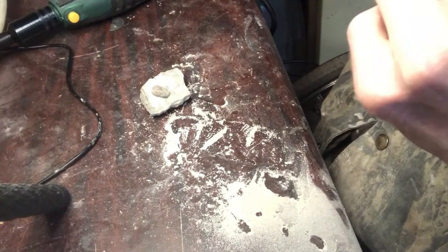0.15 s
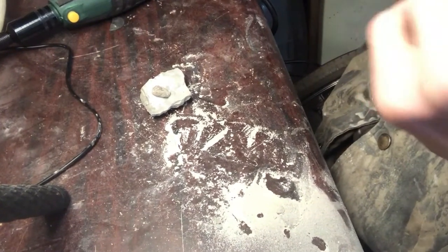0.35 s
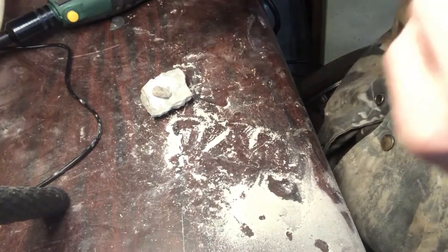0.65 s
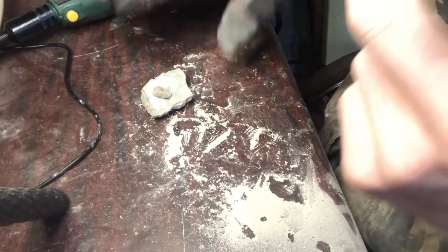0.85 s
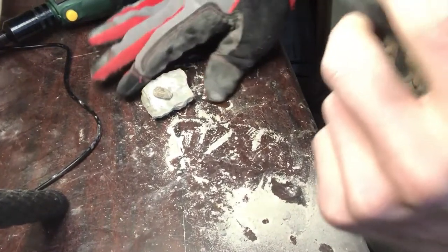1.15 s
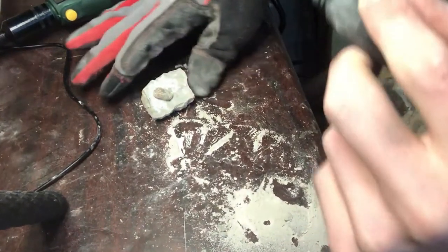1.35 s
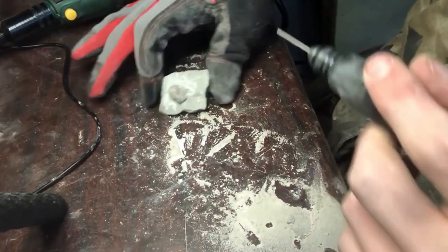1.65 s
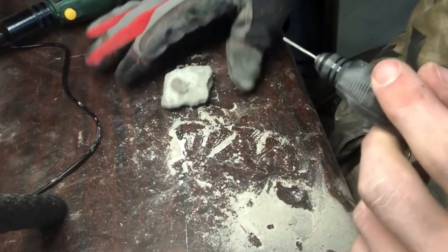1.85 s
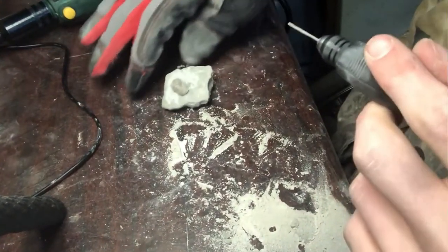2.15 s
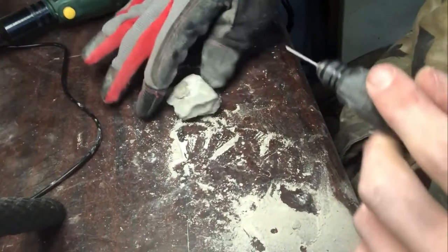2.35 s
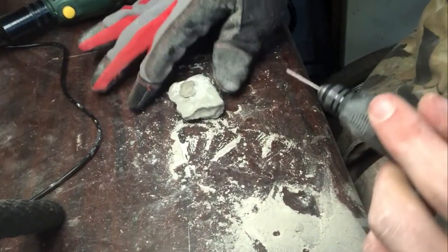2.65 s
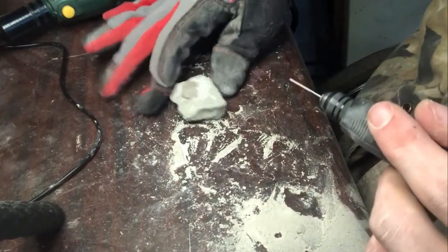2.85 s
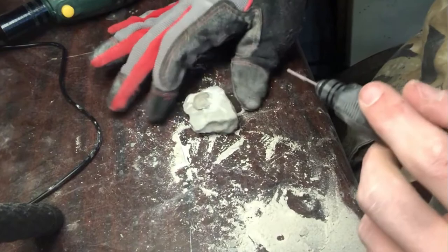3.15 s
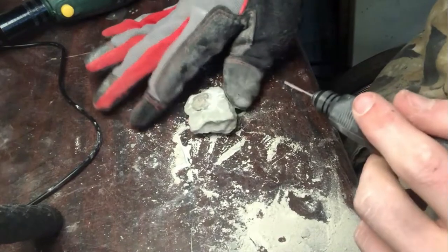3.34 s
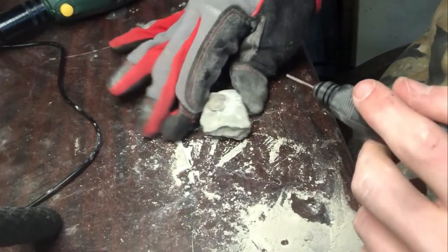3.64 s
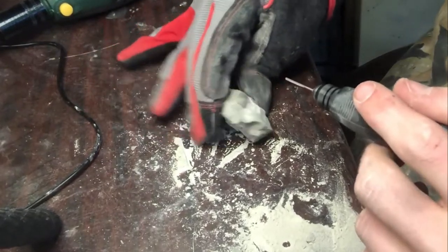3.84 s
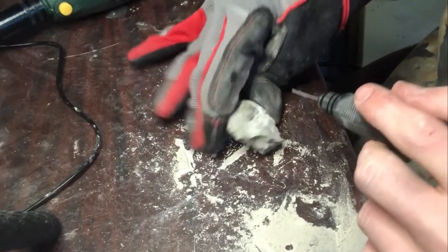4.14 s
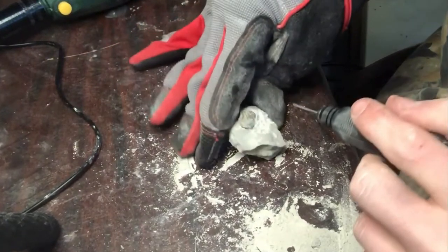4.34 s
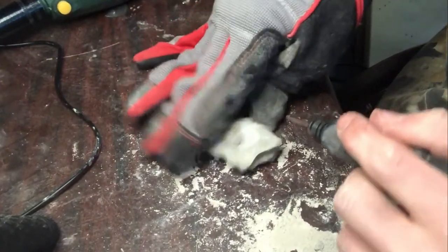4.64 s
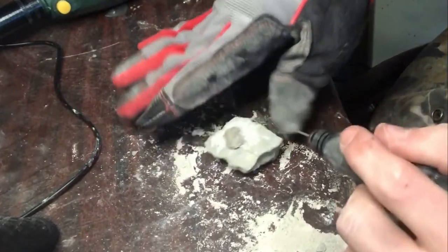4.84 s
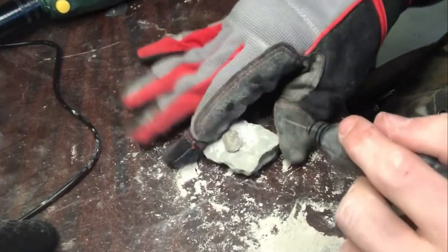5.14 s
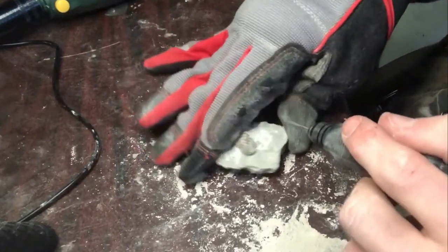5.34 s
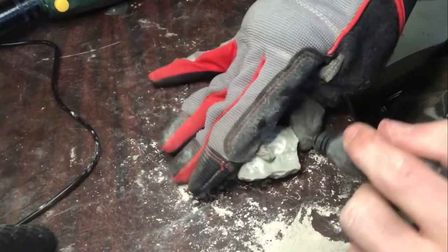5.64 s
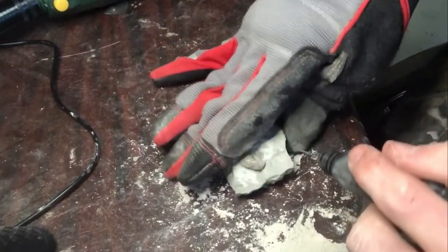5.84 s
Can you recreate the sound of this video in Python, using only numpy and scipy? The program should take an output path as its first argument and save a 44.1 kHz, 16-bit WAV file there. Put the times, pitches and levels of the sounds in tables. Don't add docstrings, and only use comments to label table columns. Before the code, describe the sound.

A handheld rotary tool whirs steadily close by in a small room, a stone clicks and scuffs on wood, then everything fades out.

```python
import sys
import numpy as np
from scipy import signal
from scipy.io import wavfile
from scipy.ndimage import uniform_filter1d

SR = 44100
rng = np.random.default_rng(int(sys.argv[2]) if len(sys.argv) > 2 else 0)


def dump_mix(stems):
    frames = np.atleast_2d(stems).T
    limited = np.clip(frames, -1, 1)
    pcm = np.round(limited * 32767).astype(np.int16)
    wavfile.write(sys.argv[1], SR, pcm)


def nominal_scale(level):
    x = np.asarray(level, float) / 20
    return 10 ** x


N = 264147
TIME = np.arange(N) / SR
STEPS = TIME[::200]

# t/s, shaft speed/Hz
SHAFT_SPEED = [(0.0, 223.79), (0.12, 224.43), (0.36, 221.79), (1.01, 226.55), (1.17, 226.78),
               (1.56, 230.95), (1.97, 233.36), (2.08, 231.53), (2.48, 231.87), (2.96, 235.38),
               (3.2, 234.21), (3.99, 237.3), (4.48, 237.77), (4.6, 237.16), (4.86, 238.15), (5.07, 235.22),
               (5.34, 235.39), (5.99, 244.26)]


def curves(rows, t):
    s, *columns = np.transpose(rows)
    return np.array([np.interp(t, s, c) for c in columns])


def slowly(values):
    return np.interp(TIME, STEPS, values)


def wander(per_s):
    count = int(N / SR * per_s) + 3
    a, b = rng.standard_normal((2, count))
    at = np.arange(count) / per_s
    return np.interp(TIME, at, a) + 1j * np.interp(TIME, at, b)


def level_db(law, t):
    law_speeds = 224, 230.5, 237, 242
    # t/s, nearness/dB, vents facing the microphone/dB, grip/-1 loose to 1 tight
    hand = [(0, 0, 0, -.6), (.4, 0, -4, -1), (.7, 0, 1.5, -.6), (1, 0, 2, 0), (1.5, 0, 1, .1),
            (1.9, 0, 2, -.3), (2.28, 0, 2, -.75), (2.44, 0, 3, .5), (2.7, 0, 1.5, .6), (3.05, -.5, -1, 1),
            (3.5, 0, -4, .3), (3.9, .5, 0, 0), (4.3, 1, 0, 0), (4.68, 1.5, 1.5, .25), (4.9, 1.5, -.5, .9),
            (5.25, 1.5, -6, .3), (5.5, 2, 2, 0), (5.99, 2, -2, .5)]
    speed_db, (share, loose_db, tight_db) = law
    near_db, facing_db, grip = curves(hand, t)
    grip_db = np.where(grip < 0, -loose_db, tight_db) * grip
    speed = curves(SHAFT_SPEED, t)[0]
    return np.interp(speed, law_speeds, speed_db) + near_db + share * facing_db + grip_db


def angles():
    slow_hz, fast_hz = 224, 237
    ripple_hz, ripple_lag_turns, start_turn = 119.975, .4, .85
    speed = curves(SHAFT_SPEED, TIME)[0]
    shaft = 2 * np.pi * (np.cumsum(speed) / SR + start_turn)
    ripple = 2 * np.pi * (ripple_hz * TIME - ripple_lag_turns)
    return shaft, ripple, np.clip((speed - slow_hz) / (fast_hz - slow_hz), 0, 1)


def motor(shaft, ripple, fast):
    strong = (0, 1, 2, 3, 8, 16, 24, 32, 48)
    # (share of facing, level when loose/dB, when tight/dB)
    strong_laws = [
        ((-58, -58.5, -57.5, -58), (.05, .1, .1)),
        ((-58, -53.5, -50, -53.5), (.05, 5, -16)),
        ((-51, -49, -52, -47), (.1, -16, -.5)),
        ((-58.5, -62, -63.5, -61), (.3, -4, .1)),
        ((-54, -51.5, -52, -51), (.25, .1, .1)),
        ((-50, -48, -48.5, -53), (.95, .1, .1)),
        ((-77, -72, -65, -66), (.2, .1, .1)),
        ((-57.5, -68, -59.5, -57), (-.3, 1, .5)),
        ((-72, -63, -61, -66), (.3, .1, .1)),
    ]
    delays = [(.05, 0, .07), (0, .22, .2), (.5, .25, .15), (0, .2, .2), (.1, 0, .2), (.2, 0, .08),
              (0, 0, .2), (.05, 0, .15), (0, 0, .2)]
    # order, ripple multiple, level when slow/dB, level when fast/dB
    low_bands = [(0, 1, -11.0, -11), (0, 2, -2, 0.6), (0, 3, -6.5, -8.5), (0, 4, -17, -8), (0, 5, -15, -17),
                 (1, 0, -4.5, -3.5), (1, 1, -17.5, -15), (1, 2, -11, -14), (2, 0, -1.5, 0.5),
                 (2, 1, -24, -11), (3, 0, -0.5, -0.5)]
    slot_bands = [(8, -3, -20, -24), (8, -2, -19.5, -20.7), (8, -1, -18.5, -15.5), (8, 0, -16.5, -7.5),
                  (8, 1, -8, -3.5), (8, 2, -7, -8.5), (8, 3, -2, -1.5), (8, 4, 0.1, -16), (8, 5, -12, -20),
                  (8, 6, -18, -20.5)]
    bar_bands = [(16, -4, -14, -33), (16, -3, -13.5, -24), (16, -2, -14.5, -19.5), (16, -1, -13, -7.5),
                 (16, 0, -1.7, 1), (16, 1, -8, -30), (16, 2, -20, -40), (16, 3, -19, -22),
                 (24, 0, -7.0, 2.8), (32, 0, 2, 4.2), (48, 0, 2, 1.7), (32, -1, -39, -22.5),
                 (32, 1, -12.5, -5), (32, -2, -20, -16), (48, -2, -23, -24), (24, -1, -6.6, -26),
                 (24, 1, -8, -16)]
    minor = (4, 5, 6, 7, 10, 9, 13, 14, 15, 17, 18, 25, 27, 29, 31, 33, 34, 35, 36, 40, 41, 42, 43, 46, 47,
             50, 53, 56, 57, 63)
    # level when slow/dB, level when fast/dB
    minor_levels = [(-68, -71.5), (-79, -72), (-69, -68), (-67, -73), (-72, -63), (-68, -65), (-80, -74),
                    (-69, -65), (-66, -61.5), (-65, -68), (-65, -71), (-74, -77), (-78, -69.5),
                    (-74.5, -72.5), (-68, -67), (-71, -62), (-73, -73), (-70, -78), (-70, -80),
                    (-82, -69.5), (-72, -80), (-78, -74.5), (-82, -68), (-69.5, -77), (-80, -68),
                    (-76, -75), (-70, -80), (-68, -76), (-80, -67), (-74, -80)]
    minor_rough, dip_db, dip_at, dip_width = 0.6, -3.5, .68, .22

    out = np.zeros(N)
    near_top = np.interp(STEPS, TIME, fast)
    for order, law, (slope, shift, rough) in zip(strong, strong_laws, delays):
        late = ripple - 2 * np.pi * slope * fast
        unsteady = 1 + rough * wander(per_s=20 + order)
        angle = order * shaft + 2 * np.pi * shift * (1 / 3 - fast) + np.angle(unsteady)
        order_db = level_db(law, STEPS)
        for carrier, multiple, slow_db, fast_db in low_bands + slot_bands + bar_bands:
            if round(carrier) == order:
                level = nominal_scale(order_db + slow_db + (fast_db - slow_db) * near_top)
                out += abs(unsteady) * slowly(level) * np.cos(angle + round(multiple) * late)

    dip = dip_db * np.exp(-((near_top - dip_at) / dip_width) ** 2)
    for order, (slow_db, fast_db) in zip(minor, minor_levels):
        unsteady = np.exp(2j * np.pi * rng.random()) + minor_rough * wander(per_s=12)
        level = nominal_scale(slow_db + (fast_db - slow_db) * near_top + dip * (order > 12))
        out += slowly(level) * (unsteady * np.exp(1j * order * shaft)).real
    return np.sqrt(2) * out


def whirl(shaft):
    half_orders = (.5, 1.5, 2.5, 3.5, 4.5, 6.5)
    half_levels = [-4, -1, 5, -2, -2, -9]
    leads = [-.1, -.17, .12, .23, -.3, -.42]
    # (share of facing, level when loose/dB, when tight/dB)
    whirl_law = (-72, -72, -66.5, -66), (.05, -7, .5)
    # t/s, shaft turns, length/s
    slips = [
        (2.3, .2, .15),
        (4.2, -1, .1),
    ]
    rough = .3
    angle = shaft - 2 * np.pi * slips[0][1]
    for s, turns, length in slips:
        angle = angle + np.pi * turns * (1 + np.tanh((TIME - s) / length))
    lines = np.zeros(N, complex)
    for order, db, lead in zip(half_orders, half_levels, leads):
        unsteady = 1 + rough * wander(per_s=5)
        lines += nominal_scale(db) * unsteady * np.exp(1j * (order * angle + 2 * np.pi * lead))
    return np.sqrt(2) * slowly(nominal_scale(level_db(whirl_law, STEPS))) * lines.real


def air(shaft, ripple):
    law_hz = (110, 450, 1300, 5000, 9500)
    # (share of facing, level when loose/dB, when tight/dB)
    air_laws = [
        ((-54, -55, -54, -53), (.05, .1, .1)),
        ((-56, -59, -57, -55), (.05, .1, .1)),
        ((-56.5, -56.5, -57, -57), (.05, .1, .1)),
        ((-56.5, -58.5, -58.5, -58), (-.1, 2, .1)),
        ((-62.5, -63, -61, -60), (.05, .5, .1)),
    ]
    # t/s, length/s, level/dB
    rumble_swells = [
        (.4, .08, 4),
        (1.89, .07, 11),
        (2.08, .06, 9),
        (2.27, .04, 6),
        (2.5, .08, 4),
        (3, .08, 4),
        (3.9, .07, 5),
        (4.1, .07, 5),
        (4.72, .1, 4),
    ]
    # f/Hz, level per Hz under the law/dB
    colour = [(30, -55), (85, -50), (230, -34), (450, -30.5), (850, -31), (1200, -34.5), (2100, -31),
              (2700, -33.5), (3800, -30.5), (5000, -31.5), (5800, -34.5), (7600, -33), (8300, -34),
              (15700, -35)]
    # f/Hz, width/Hz, level/dB
    bumps = [
        (12300, 580, 3),
        (6770, 500, 2.5),
        (57.6, 18, 16),
    ]
    patchy_db = 1.2

    hz, t, z = signal.stft(rng.standard_normal(N), SR, nperseg=1024, noverlap=768)
    levels = np.array([level_db(law, t) for law in air_laws])
    for s, length, db in rumble_swells:
        levels[1] += db * np.exp(-((t - s) / length) ** 2)
    field_db = np.array([np.interp(np.log(hz + 1), np.log(law_hz), column) for column in levels.T]).T
    f, db = np.transpose(colour)
    colour_db = np.interp(np.log(hz + 1), np.log(f), db)
    for centre, width, bump_db in bumps:
        colour_db += bump_db * np.exp(-((hz - centre) / width) ** 2)
    patches = uniform_filter1d(uniform_filter1d(rng.standard_normal(z.shape), 8, 0), 12, 1)
    patches_db = patchy_db * patches / patches.std()
    z = z * nominal_scale(field_db + colour_db[:, None] + patches_db) * np.sqrt(SR / 2)

    housing = np.exp(-((hz - 2200) / 900) ** 2)[:, None]
    top = np.clip((hz - 6000) / 3000, 0, 1)[:, None]
    sparks, fan, rest = [signal.istft(z * share, SR, nperseg=1024, noverlap=768)[1][:N]
                         for share in (housing, top, 1 - housing - top)]
    return sparks * (1 + 0.1 * np.cos(ripple - .4)) + fan * (1 + .12 * np.cos(shaft)) + rest


def squeak(shaft):
    # t/s, f/Hz, level/dB
    course = [
        (.118, 13260, -75),
        (.13, 13230, -54),
        (.175, 13170, -58),
        (.21, 13265, -50),
        (.25, 13220, -54),
        (.285, 13080, -52),
        (.32, 13110, -58),
        (.345, 13350, -59),
        (.365, 13400, -75),
    ]
    hz, db = curves(course, TIME)
    on = (TIME > course[0][0]) & (TIME < course[-1][0])
    comb = .75 + .75 * np.exp(-1j * shaft) + .25 * np.exp(1j * shaft) + .3 * np.exp(-2j * shaft)
    unsteady_hz = hz + 40 * wander(per_s=40).real
    whistle = np.exp(2j * np.pi * np.cumsum(unsteady_hz) / SR) * (1 + .6 * wander(per_s=130))
    return np.sqrt(2) * on * nominal_scale(db) * (comb * whistle).real


def knocks():
    # f/Hz, level/dB, t60/s
    modes = [(410, -10, .07), (680, -14, .06), (1090, -9, .05), (1310, -8, .05), (1745, 0, .036),
             (2215, -1, .03), (2490, -6, .025), (3270, -10, .02)]
    # t/s, peak level/dB, brightness/dB per octave
    contacts = [(1.549, -50, 0), (1.8202, -27.5, 1.5), (1.828, -43, -2), (1.853, -44, -8), (1.9, -46, -4),
                (2.055, -43, -6), (2.25, -44, -6), (2.385, -45, -6), (2.98, -45, -9), (3.18, -46, -9),
                (4.7624, -37, 0)]
    out, t = np.zeros(N), np.arange(4000) / SR
    for s, peak_db, tilt_db in contacts:
        ring = np.zeros(len(t))
        for hz, db, t60 in modes:
            tune = rng.uniform(.99, 1.01)
            decay = nominal_scale(db + tilt_db * np.log2(hz / 1500) - 60 * t / t60)
            ring += decay * np.sin(2 * np.pi * hz * tune * t)
        ring *= 1 - np.exp(-t / .0005)
        out[round(s * SR):][:len(t)] += nominal_scale(peak_db) * ring / abs(ring).max()
    return out


def room_tone():
    noise = rng.standard_normal(N)
    low = signal.lfilter(*signal.butter(2, [50, 160], "bandpass", fs=SR), noise)
    return nominal_scale(-43) * low / low.std() + nominal_scale(-52) * signal.lfilter([.3], [1, -.7], noise)


def scene():
    fade_times = 4.93, 5.93, 5.957
    shaft, ripple, fast = angles()
    bench = motor(shaft, ripple, fast) + whirl(shaft) + air(shaft, ripple) + squeak(shaft) + knocks()
    start, end, back = fade_times
    fade_out = np.clip((end - TIME) / (end - start), 0, 1)
    fade_in = np.clip(TIME - back, 0, 1)
    return (bench * fade_out + room_tone() * fade_in)[None]


def roll_off(x):
    return signal.sosfilt(signal.butter(12, 15720, fs=SR, output="sos"), x)


def record(dry):
    thin = signal.sosfilt(signal.butter(3, 48, "highpass", fs=SR, output="sos"), dry)
    return roll_off(thin)


dry = scene()
out = record(dry)
dump_mix(out)
```